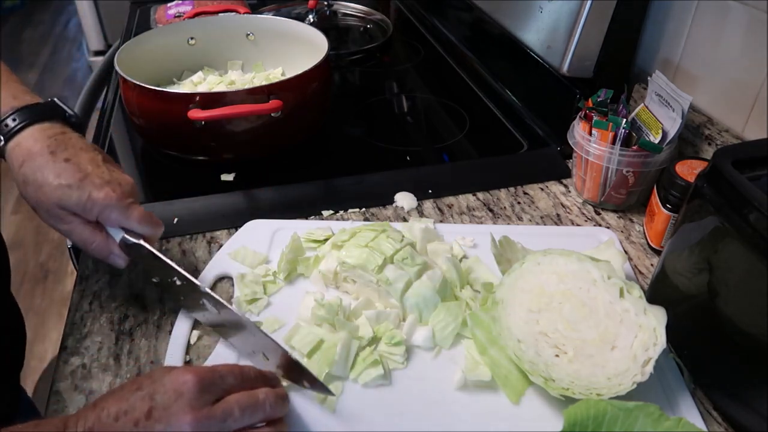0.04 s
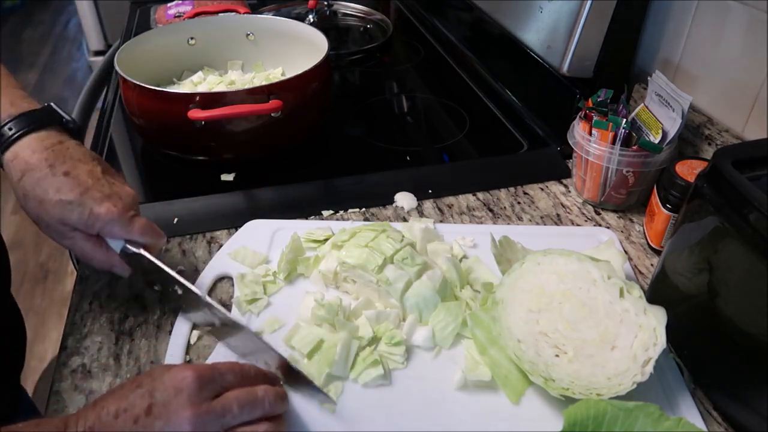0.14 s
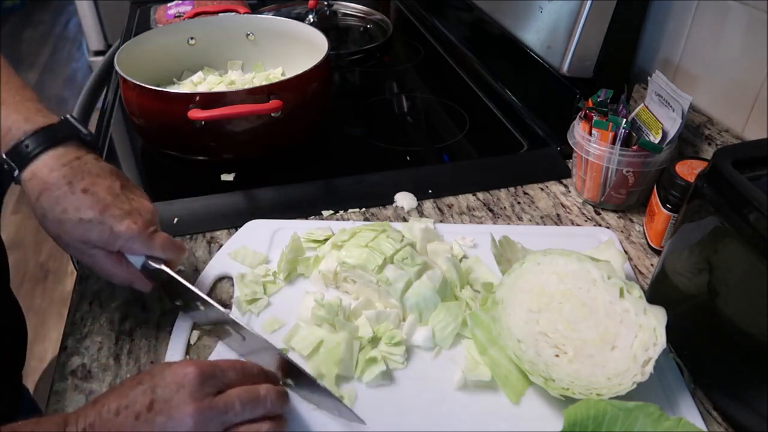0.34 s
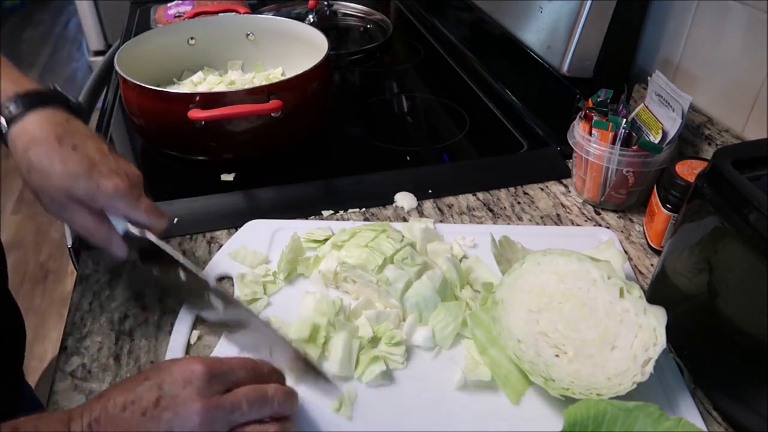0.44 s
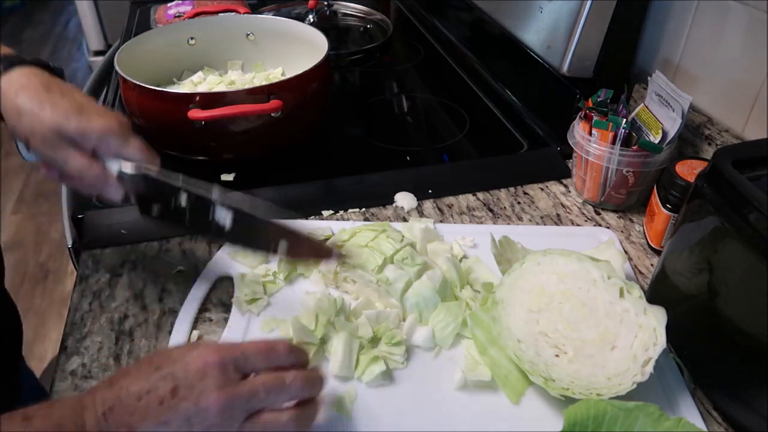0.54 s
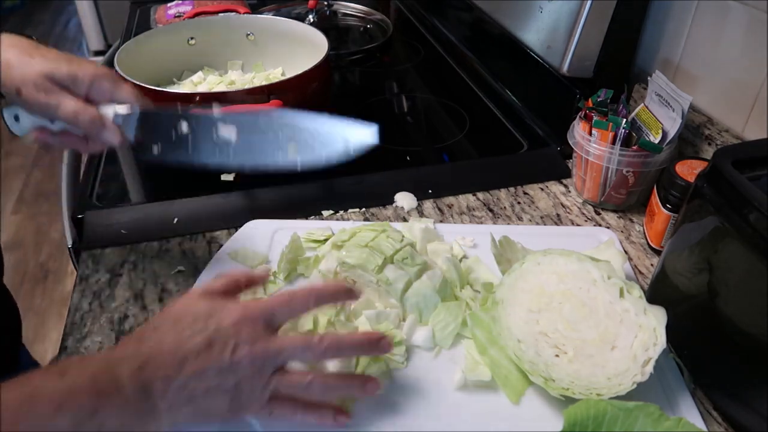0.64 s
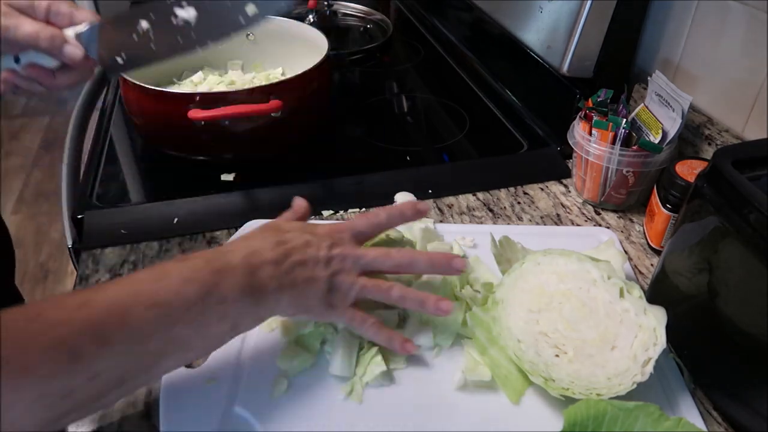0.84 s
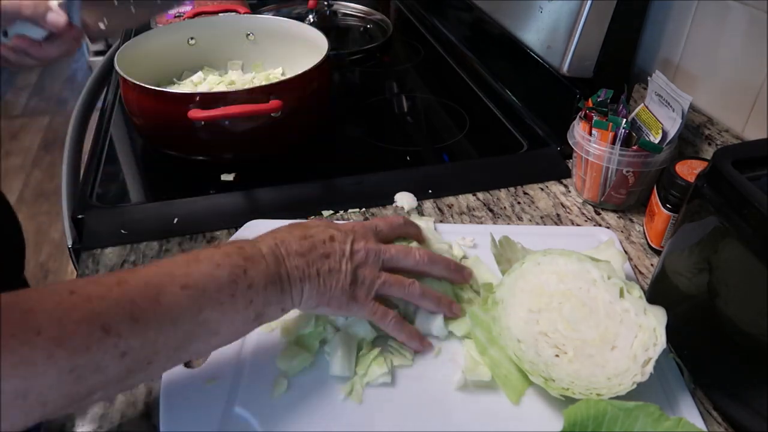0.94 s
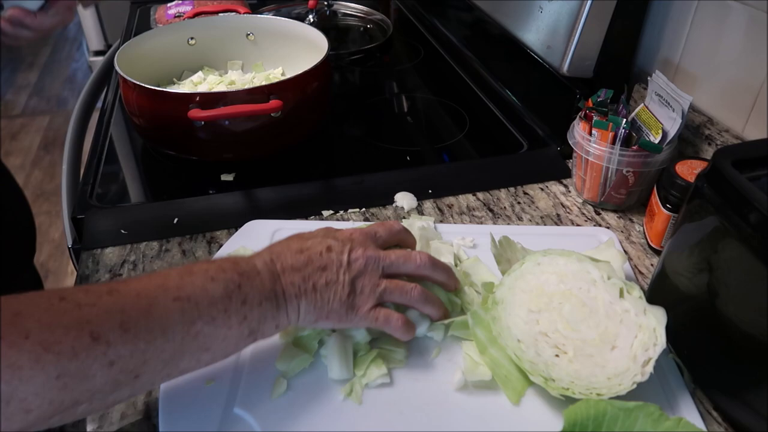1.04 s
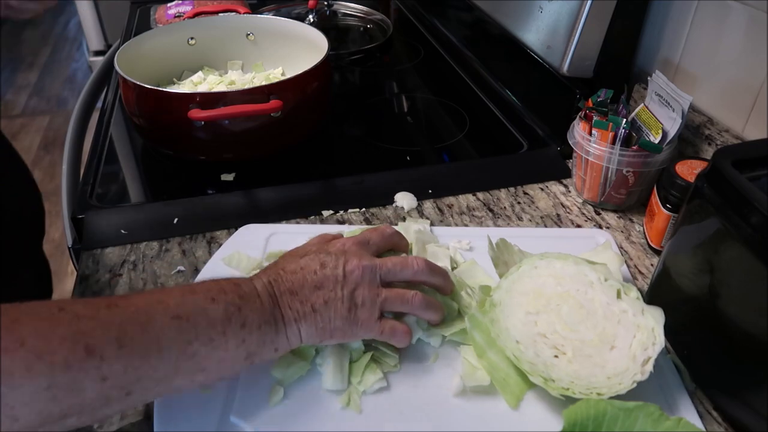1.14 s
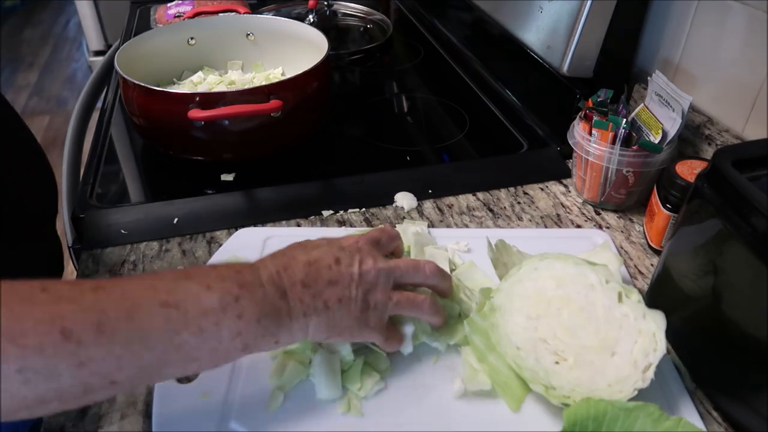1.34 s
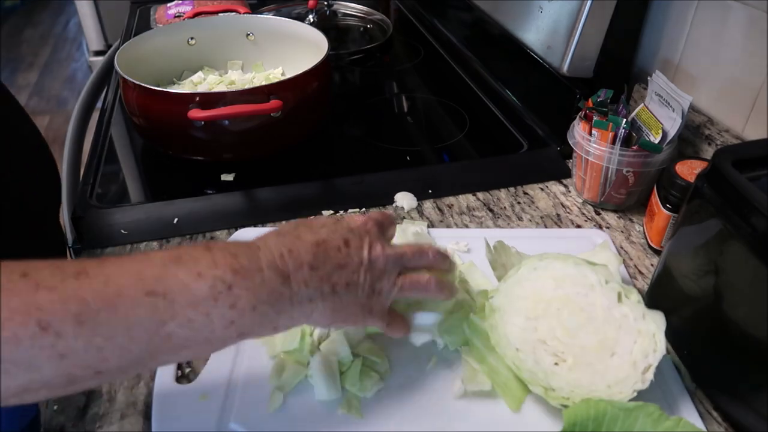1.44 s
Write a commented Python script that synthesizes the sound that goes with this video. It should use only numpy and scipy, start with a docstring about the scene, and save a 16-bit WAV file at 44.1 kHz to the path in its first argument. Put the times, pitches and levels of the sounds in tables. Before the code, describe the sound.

A knife crunches through cabbage and lands with a loud, slightly clipped knock on a plastic board; later a hand gathers the pieces with a crisp rustle. Close microphone, small kitchen, low fan hum.

```python
"""A kitchen: a knife crunches through cabbage and knocks on a plastic board; a hand gathers the pieces.
Cabbage is filtered random grains, squeaks are stick-slip tones, and presses on the board are low noise.
The knock is a sum of decaying modes with a noise crack, followed by early reflections.
A fan of coloured noise and wavering hum tones runs behind, and a diffuse room tail follows the near sounds.
The knock overloads the close microphone, whose gain control ducks and slowly recovers."""
import sys
import numpy as np
from scipy import signal
from scipy.fft import rfft, irfft
from scipy.io import wavfile

SR = 44100
rng = np.random.default_rng(int(sys.argv[2]) if len(sys.argv) > 2 else 0)


def materialize(psi):
    """Save the field psi as 16-bit PCM at rate SR to the path in sys.argv[1].

    A 1-D psi becomes a single channel; in a 2-D psi each row is a channel.
    """
    bounded = np.clip(np.atleast_2d(psi).T, -1, 1)
    quanta = np.round(bounded * 32767).astype(np.int16)
    wavfile.write(sys.argv[1], SR, quanta)


N = 66150
T = np.arange(N) / SR   # time axis, s


def from_db(db):
    """Logarithmic level: decibels to amplitude gain."""
    return 10 ** (np.asarray(db) / 20)


def rms_one(x):
    """Power normalisation: scale to a mean square of one."""
    return x / np.sqrt(np.mean(x ** 2) + 1e-20)


def at_hz(points, hz, axis=1):
    """Logarithmic frequency scale: interpolate a table column along it."""
    table = np.array(points)
    offset_hz = 0.00085   # keeps the logarithm finite at 0 Hz
    return np.interp(np.log(hz + offset_hz), np.log(table[:, 0]), table[:, axis])


def shape(x, response):
    """Linear filtering: multiply the zero-padded spectrum by a function of frequency."""
    size = 2 * N
    hz = np.arange(N + 1) * SR / size
    return irfft(rfft(x, size) * response(hz), size)[..., :N]


def colour(x, spectrum):
    """Spectral shaping: give a flat sound a tabled spectrum, at unit power."""
    return rms_one(shape(x, lambda hz: from_db(at_hz(spectrum, hz))))


def low_cut(x, hz, order=2):
    """High-pass filtering with a Butterworth response."""
    return signal.sosfilt(signal.butter(order, hz, "high", fs=SR, output="sos"), x)


def drift(rate_hz):
    """Slow random fluctuation: low-passed noise with a spread of 1."""
    return rms_one(shape(rng.standard_normal(N), lambda hz: 1 / (1 + (hz / rate_hz) ** 2)))


def burst(start, t60):
    """Exponential decay: a sudden start, then a fall of 60 dB in t60 seconds."""
    return (T >= start) * from_db(-60 * np.maximum(T - start, 0) / t60)


def swell(peak, half_length):
    """Gaussian envelope: a smooth bump that is 1/e high at half_length from its peak."""
    return np.exp(-((T - peak) / half_length) ** 2)


def ports(x, lag_s):
    """Interaural-type delay: a near source reaches the right microphone port lag_s after the left."""
    right = shape(x, lambda hz: np.exp(-2j * np.pi * hz * lag_s))
    return np.array([x, right])


# Stereo spread of a diffuse field: (frequency [Hz], side against middle [dB])
SIDE_SPECTRUM = [(30, -16), (60, -26.5), (120, -19.5), (300, -20), (600, -17.5), (1500, -11.5), (4000, -2),
                 (12000, 7)]


def diffuse_noise(side_db=0):
    """Diffuse-field coherence: stereo noise that is alike in the bass, unrelated in the treble."""
    middle, side = rng.standard_normal((2, N))
    # side never exceeds middle
    side = shape(side, lambda hz: from_db(np.minimum(at_hz(SIDE_SPECTRUM, hz) + side_db, 0)))
    return np.array([middle + side, middle - side])


# Fan and room air: (frequency [Hz], relative density [dB per Hz])
FAN_SPECTRUM = [(20, -20.5), (40, -25.5), (65, 0), (85, -5.5), (140, -1.5), (190, -7.5), (300, -1.5),
                (400, 2), (520, 1.5), (620, -10.5), (800, -12), (1300, -18), (2400, -23), (4000, -36),
                (7000, -43.5), (12000, -56), (16000, -46.5)]
# Mains and motor tones: (frequency [Hz], rms level before waver [dB], waver [0-1])
HUM_TONES = [(59, -53, 0), (120.2, -43, 0.1), (201.4, -60.5, .3), (309.6, -50, .4), (484.4, -49.5, 0.6)]
FAN_DB, HUM_SIDE_DB = -36.5, -25.5   # air rms; port difference of the hum against its steady part
HUM_WAVER_HZ = 4


def fan():
    """Broadband flow noise plus modulated tones: rushing air and hum, a little different at each port."""
    hum = 0
    opposite_ports = np.array([[1], [-1]])
    for hz, db, waver in HUM_TONES:
        wavering = waver * (drift(HUM_WAVER_HZ) + 1j * drift(HUM_WAVER_HZ))
        difference = from_db(HUM_SIDE_DB) * 1j * drift(HUM_WAVER_HZ) * opposite_ports
        carrier = np.exp(2j * np.pi * (hz * T + rng.random()))
        tone = np.real((1 + wavering + difference) * carrier)
        hum = hum + from_db(db) * np.sqrt(2) * tone
    return from_db(FAN_DB) * colour(diffuse_noise(), FAN_SPECTRUM) + hum


GRAIN_SPREAD_DB = 3   # times an exponential draw capped at 4


def grains(per_s):
    """Random impulse process: tiny clicks of uneven size and either sign."""
    size_db = GRAIN_SPREAD_DB * np.minimum(rng.exponential(1, N), 4)
    clicks = from_db(size_db) * rng.choice([-1, 1], N)
    return clicks * (rng.random(N) < per_s / SR)


CABBAGE_LAG_S = -0.000015   # negative: the right port hears it first


def scattered(per_s, spectrum, width_db):
    """Middle-side superposition: coloured grains from pieces spread over the board."""
    side = from_db(width_db) * colour(grains(per_s), spectrum)
    middle = colour(grains(per_s), spectrum)
    return ports(middle, CABBAGE_LAG_S) + np.array([side, -side])


# Cabbage is cut, pushed or gathered: (peak time [s], rise [s], fall [s],
# dull rubbing [dB], crisp snapping [dB], wet fizz [dB])
CRUNCH_EVENTS = [(.05, 0.1, 0.31, -47, -77, -92), (0.173, 0.064, .05, -39, -49.5, -62),
                 (0.216, 0.025, .014, -25, -27, -29.5), (0.244, 0.023, 0.097, -17, -26.5, -54),
                 (.46, 0.08, 0.069, -43.5, -62, -63.5), (.515, 0.12, 0.085, -49, -53, -66),
                 (.735, 0.052, 0.044, -57, -58.5, -69.5), (0.945, 0.018, 0.052, -42.5, -60, -63.5),
                 (0.971, 0.057, 0.042, -54, -52, -57), (1.022, .012, 0.08, -56, -51, -57.5),
                 (1.059, 0.0064, 0.05, -31.5, -65, -58), (1.093, 0.028, 0.023, -20.5, -33.5, -34),
                 (1.117, 0.063, 0.034, -22, -33, -53), (1.16, 0.078, 0.17, -42, -43, -52),
                 (1.226, 0.049, 0.032, -43, -45.5, -55.5), (1.283, 0.019, 0.071, -69, -53.5, -64),
                 (1.326, 0.041, 0.15, -45, -50, -54), (1.42, 0.1, .12, -48.5, -54, -58.5),
                 (1.48, 0.061, .045, -41, -48, -49)]
# Single ribs break: (time [s], level [dB])
RIB_BREAKS = [(1.0565, -49), (1.0904, -24), (1.092, -22), (1.0975, -32), (1.3084, -44.5)]
# Leaves rubbing on the board: (frequency [Hz], relative density [dB per Hz])
RUB_SPECTRUM = [(300, -17), (680, -8), (920, -9), (1140, 0), (1470, -1.5), (1800, -3.5), (2100, -2),
                (2500, -9), (4000, -20.5), (8000, -41.5)]
# Ribs snapping: (frequency [Hz], relative density [dB per Hz])
SNAP_SPECTRUM = [(800, -14.5), (2000, 3), (3000, 1.5), (4200, 2), (5700, -0.5), (6700, -7.5), (9000, -14),
                 (12000, -21.5), (15500, -42)]
# Wet cells fizzing: (frequency [Hz], relative density [dB per Hz])
FIZZ_SPECTRUM = [(2000, -20), (6500, -6.5), (8500, 1), (12000, -0.5), (15500, -13.5)]
RUBS_PER_S, SNAPS_PER_S, FIZZ_PER_S = 5000, 3500, 1600
RUB_WIDTH_DB, SNAP_WIDTH_DB = -21, -4   # side against middle; fizz is as wide as the snaps
BREAK_T60_S = 0.062
CLUMP_DB, CLUMP_HZ = 2.0, 70   # spread and rate of the uneven snapping and fizzing


def cabbage():
    """Granular fracture and friction: leaves rub on the board, ribs snap in clumps, wet cells fizz."""
    rub_power, fizz_power = 0, 0
    clumps = from_db(CLUMP_DB * drift(CLUMP_HZ))
    snap_power = sum((from_db(db) * burst(start, BREAK_T60_S)) ** 2 for start, db in RIB_BREAKS)
    for peak, rise, fall, rub_db, snap_db, fizz_db in CRUNCH_EVENTS:
        # 20 dB below the peak at the rise time before it and the fall time after it
        swell_db = -20 * np.maximum((peak - T) / rise, (T - peak) / fall)
        rub_power = rub_power + from_db(rub_db + swell_db) ** 2
        snap_power = snap_power + from_db(snap_db + swell_db) ** 2
        fizz_power = fizz_power + from_db(fizz_db + swell_db) ** 2
    rub = np.sqrt(rub_power) * scattered(RUBS_PER_S, RUB_SPECTRUM, RUB_WIDTH_DB)
    snap = np.sqrt(snap_power) * clumps * scattered(SNAPS_PER_S, SNAP_SPECTRUM, SNAP_WIDTH_DB)
    fizz = np.sqrt(fizz_power) * clumps * scattered(FIZZ_PER_S, FIZZ_SPECTRUM, SNAP_WIDTH_DB)
    return rub + snap + fizz


# Blade and wet leaves stick and slip on the plastic:
# (peak time [s], half length [s], centre frequency [Hz], peak level [dB])
SQUEAK_EVENTS = [(0.028, 0.024, 1740, -42.5), (0.128, 0.087, 1770, -48.5), (0.2, 0.013, 1320, -28.5),
                 (0.463, 0.015, 1650, -34), (0.949, 0.014, 1130, -37), (1.124, 0.016, 1280, -23.5)]
SQUEAK_WIDTH_HZ = 80   # spread of the pitch


def squeaks():
    """Stick-slip oscillation: short tones roughened by random frequency modulation."""
    waver_hz = SQUEAK_WIDTH_HZ * drift(200)
    out = 0
    for peak, length, hz, db in SQUEAK_EVENTS:
        phase = 2 * np.pi * np.cumsum(hz + waver_hz) / SR
        out = out + from_db(db) * swell(peak, length) * np.sin(phase)
    return out


# Hand and knife press on the board: (peak time [s], half length [s], level [dB])
BOARD_PRESSES = [(0.058, 0.021, -36.5), (0.205, 0.025, -40), (0.246, .022, -28), (1.134, 0.026, -35),
                 (1.235, 0.023, -36.5), (1.46, 0.077, -43)]
# The boom of the pressed board: (frequency [Hz], relative density [dB per Hz])
BOOM_SPECTRUM = [(30, -20), (60, -16), (90, -13), (118, 27.5), (160, -8.5), (300, -5), (520, -33),
                 (800, -32.5), (2000, -56.5)]


def board_boom():
    """Low-frequency forced vibration: soft rumbles of the board on the counter."""
    pressure = sum(from_db(db) * swell(peak, length) for peak, length, db in BOARD_PRESSES)
    return pressure * colour(diffuse_noise(), BOOM_SPECTRUM)


# Room tail: (frequency [Hz], level [dB], t60 [s])
ROOM_BANDS = [(100, -4, 0.19), (500, 3.5, .25), (1000, -5.5, 0.2), (2000, -1.5, 0.34), (4000, 7, .25),
              (7400, 3, 0.077), (14000, 6.5, 0.1)]
ROOM_DELAY_S, ROOM_SIDE_DB = 0.0041, -2.5   # onset of the tail; offset to its side spectrum


def kitchen(x):
    """Reverberation: convolution with a short diffuse tail that dies band by band."""
    edges = np.geomspace(70, 18000, 13)
    noises = (diffuse_noise(ROOM_SIDE_DB), diffuse_noise(ROOM_SIDE_DB))   # used by alternate bands
    tail = 0
    for k, (low, high) in enumerate(zip(edges, edges[1:])):
        hz = np.sqrt(low * high)
        decay = from_db(-60 * T / at_hz(ROOM_BANDS, hz, axis=2)) * (T > ROOM_DELAY_S)
        band_pass = signal.butter(2, [low, high], "band", fs=SR, output="sos")
        band = signal.sosfilt(band_pass, noises[k % 2])
        unit_decay = decay / np.sqrt(2 * np.sum(decay ** 2))
        tail = tail + band * from_db(at_hz(ROOM_BANDS, hz)) * unit_decay
    return signal.fftconvolve(x[None], tail, axes=1)[:, :N]


def ring(start, hz, t60):
    """Damped free vibration: a struck mode with an initial envelope of 1."""
    return np.sin(2 * np.pi * hz * (T - start)) * burst(start, t60)


# The blade lands on the board: (time [s], strength [dB])
BLADE_LANDINGS = [(0.2186, 2.5), (0.2226, -11.5)]
# Modes of the board: (frequency [Hz], level relative to the strength [dB], t60 [s])
BOARD_MODES = [(108.6, -22.5, 0.16), (250, -27, 0.083), (447, -11, 0.015), (606, -17.5, 0.079),
               (936, -2.5, 0.016), (1111, 0.5, 0.033), (1314, 0.5, 0.018), (1602.6, 4.5, 0.026),
               (1747, -4.5, .035), (2189, -4, .03), (2369, -0.5, 0.022), (3280, -9.5, .018),
               (4910, -9.5, 0.0057), (5900, -11.5, .012)]
# The edge biting into the plastic: (frequency [Hz], relative density [dB per Hz])
CRACK_SPECTRUM = [(200, 1.5), (800, -7), (2000, 11), (4000, -3), (7000, -11), (12000, -13.5),
                  (16000, -27.5)]
CRACK_DB, CRACK_T60_S = -3, 0.036   # level relative to the strength
KNOCK_LOW_CUT_HZ = 90   # the knock carries little deep bass


def knife():
    """Modal excitation: each landing cracks as a noise burst and rings the board's modes."""
    crack = colour(rng.standard_normal(N), CRACK_SPECTRUM)
    out = 0
    for start, strength_db in BLADE_LANDINGS:
        modes = 0
        for k, (hz, db, t60) in enumerate(BOARD_MODES):
            sign = (-1) ** k   # neighbouring modes move oppositely
            modes = modes + sign * from_db(db) * ring(start, hz, t60)
        bite = from_db(CRACK_DB) * crack * burst(start, CRACK_T60_S)
        out = out + from_db(strength_db) * (modes + bite)
    return low_cut(out, KNOCK_LOW_CUT_HZ)


# Near surfaces mirror the knock: (delay [s], level [dB], side [-1 right to 1 left])
REFLECTIONS = [(.0031, -14.5, 1), (.0057, -19, -1), (0.0145, -16, .5), (0.0249, -19.5, -0.4)]


def echoes(x):
    """Specular reflection: delayed, panned copies off stove, counter and wall."""
    out = 0
    for delay, db, side in REFLECTIONS:
        delayed = np.interp(T - delay, T, x, left=0)
        out = out + from_db(db) * delayed * np.array([[1 + side], [1 - side]])
    return out


KNOCK_LAG_S = 1.2e-5   # the right port hears the knock later by this
KNOCK_ROOM_DB, CABBAGE_ROOM_DB = -5, -11   # sent to the room


def scene():
    """Superposition of direct and reverberant fields: knife and cabbage close by, kitchen and fan behind."""
    knock = knife()
    leaves = cabbage() + squeaks()
    to_room = from_db(KNOCK_ROOM_DB) * knock + from_db(CABBAGE_ROOM_DB) * leaves.mean(axis=0)
    near = ports(knock, KNOCK_LAG_S) + echoes(knock) + leaves + board_boom()
    return near + kitchen(to_room) + fan()


THRESHOLD_DB, MAX_DUCK_DB, RECOVER_DB_PER_S = -2.5, 10.5, 9.5
ATTACK_S = 0.008   # time constant of the gain smoothing
LOW_CUT_HZ, CUTOFF_HZ = 42, 16500


def record(dry):
    """Dynamic compression: gain ducks too late for the knock, which clips; rumble and top are cut."""
    level_db = 20 * np.log10(np.abs(dry).max(axis=0) + 1e-9)
    over_db = np.clip(level_db - THRESHOLD_DB, 0, MAX_DUCK_DB)
    # hold the excess, letting it creep back at a steady rate
    recovery_db = RECOVER_DB_PER_S * T
    held_db = np.maximum.accumulate(over_db + recovery_db) - recovery_db
    pole = np.exp(-1 / (ATTACK_S * SR))
    duck_db = signal.lfilter([1 - pole], [1, -pole], held_db)
    clipped = np.clip(dry * from_db(-duck_db), -.95, .95)
    top_cut = signal.cheby2(12, 60, CUTOFF_HZ, fs=SR, output="sos")
    return signal.sosfilt(top_cut, low_cut(clipped, LOW_CUT_HZ))


dry = scene()
out = record(dry)
materialize(out)
```